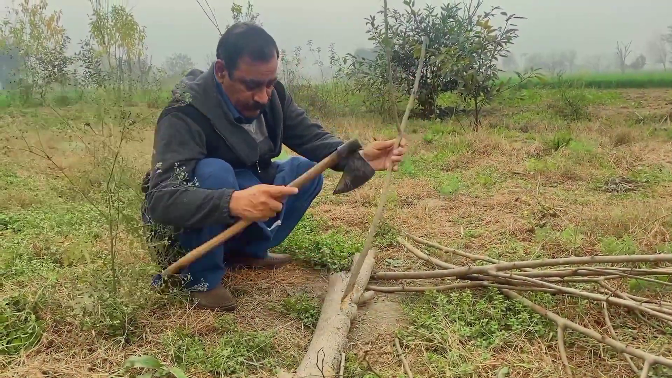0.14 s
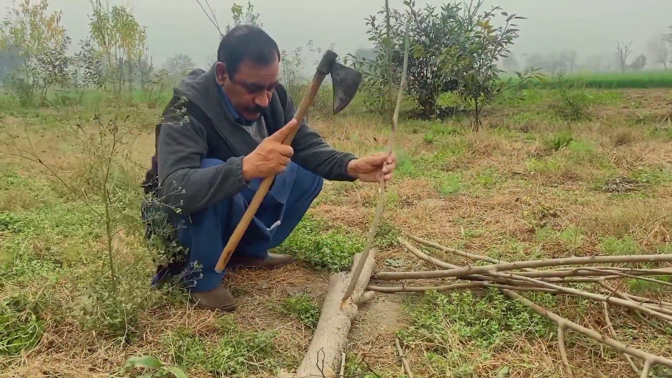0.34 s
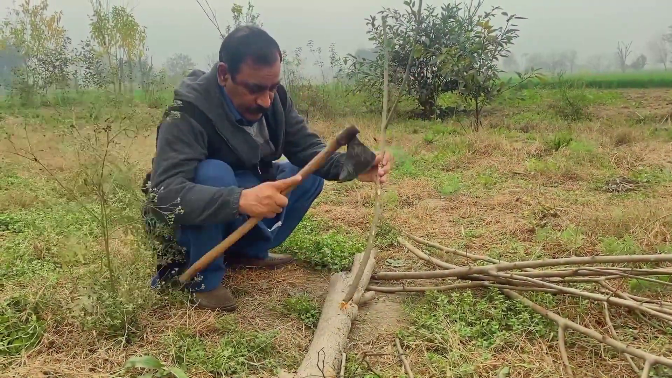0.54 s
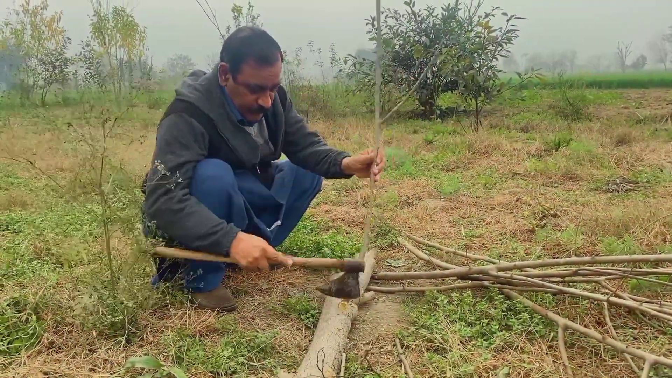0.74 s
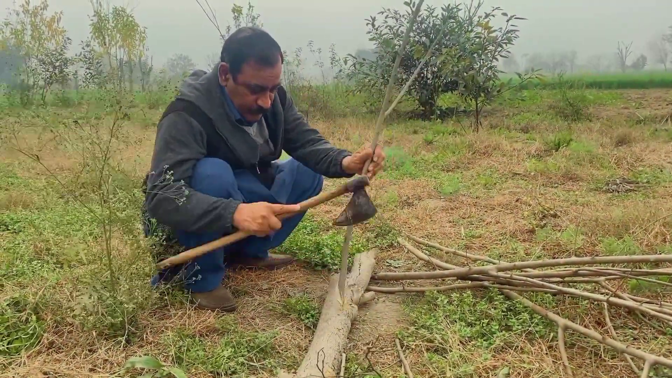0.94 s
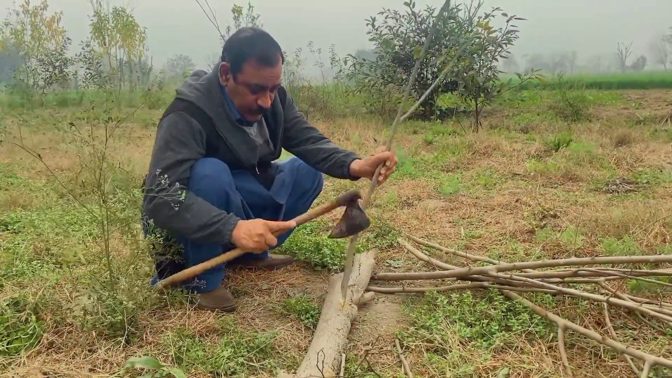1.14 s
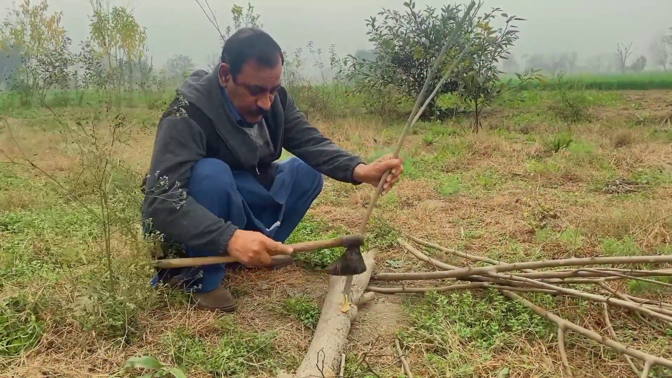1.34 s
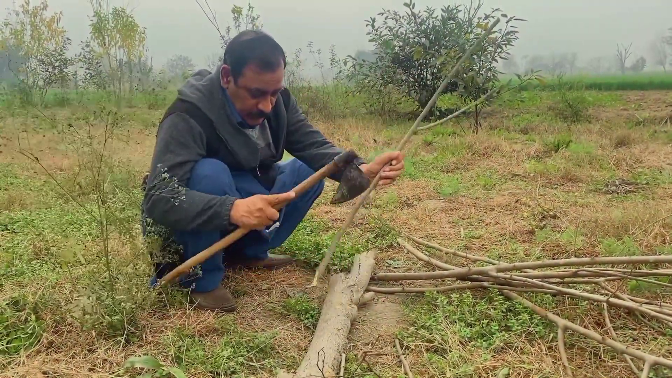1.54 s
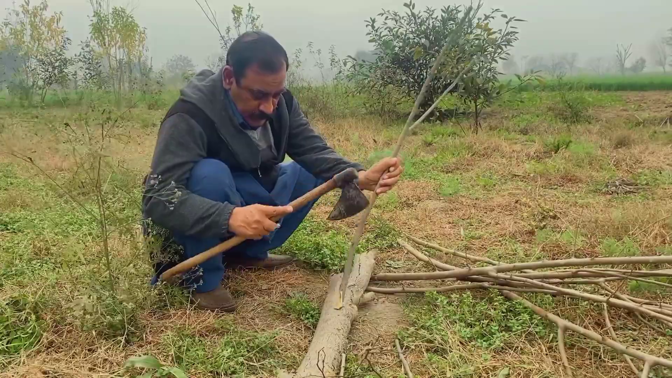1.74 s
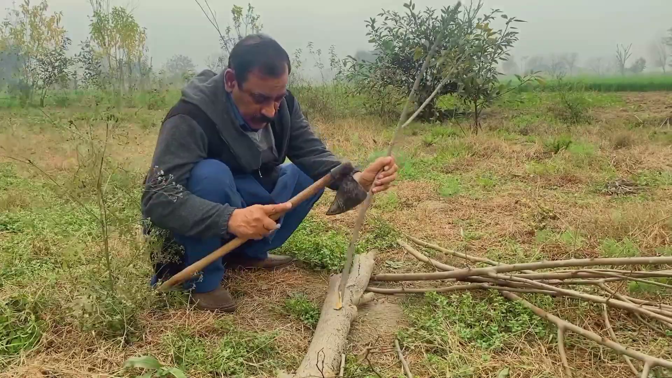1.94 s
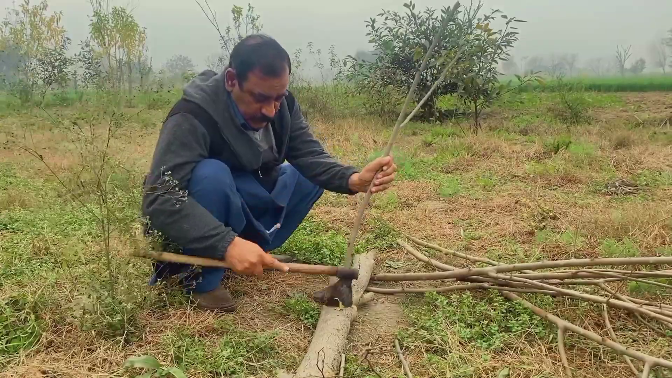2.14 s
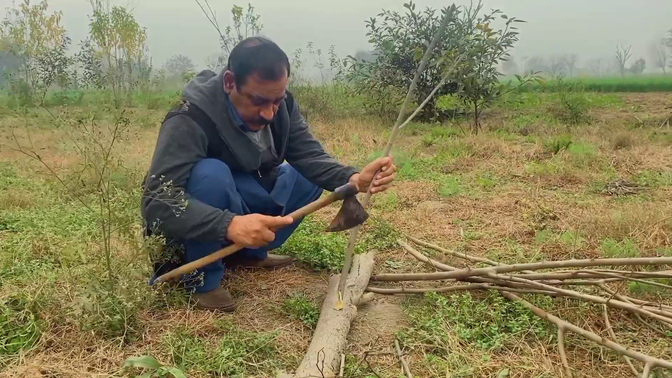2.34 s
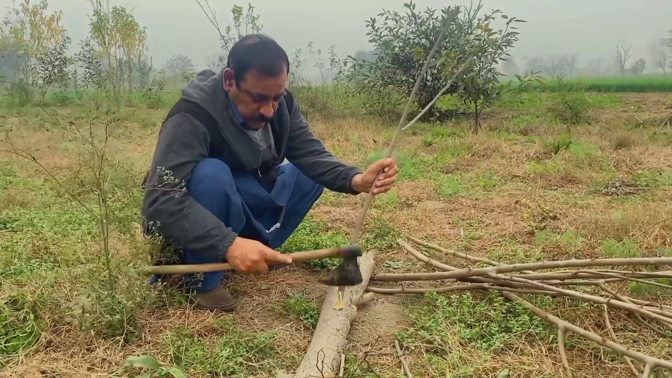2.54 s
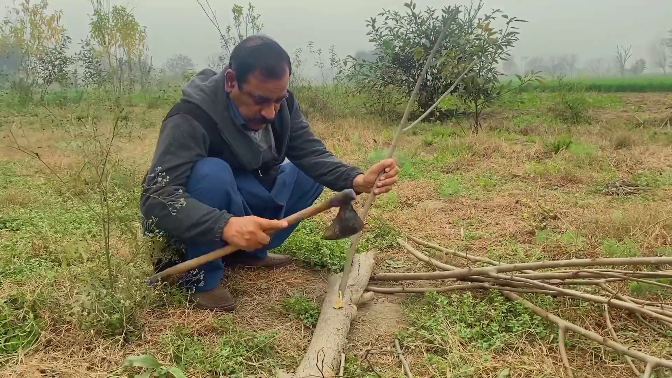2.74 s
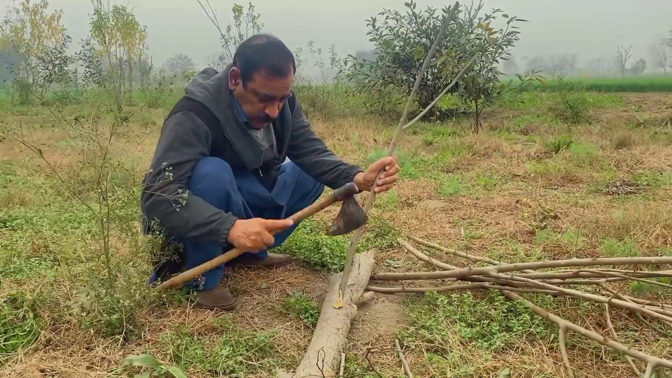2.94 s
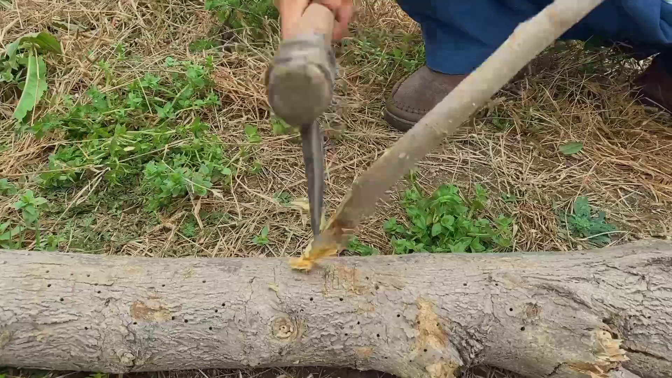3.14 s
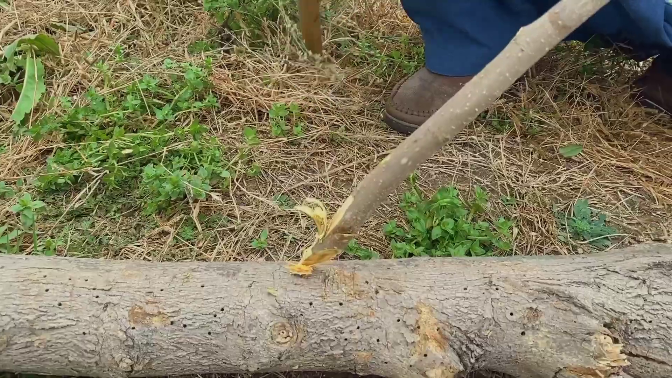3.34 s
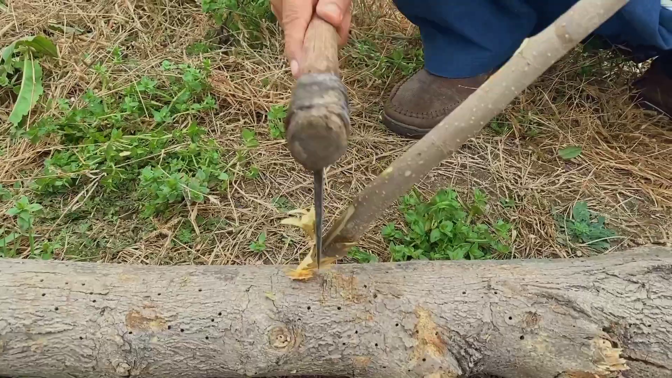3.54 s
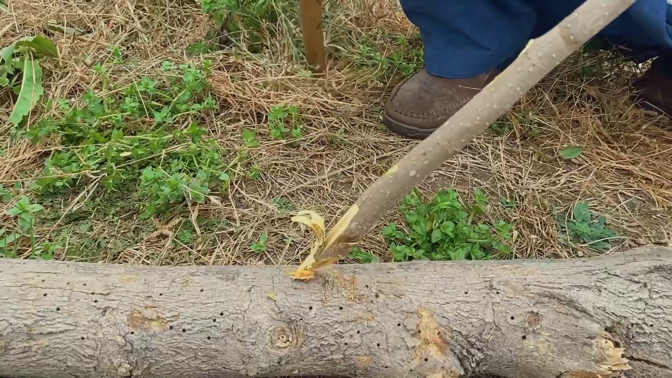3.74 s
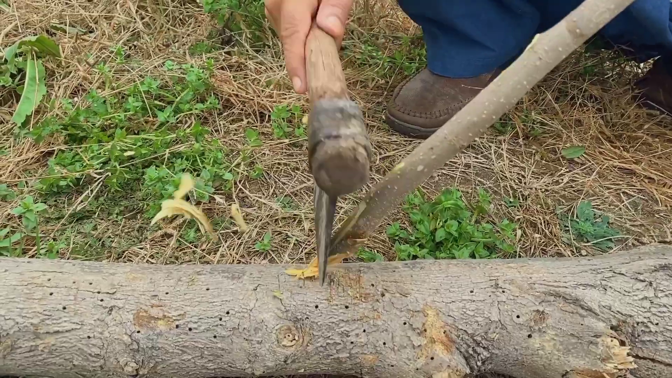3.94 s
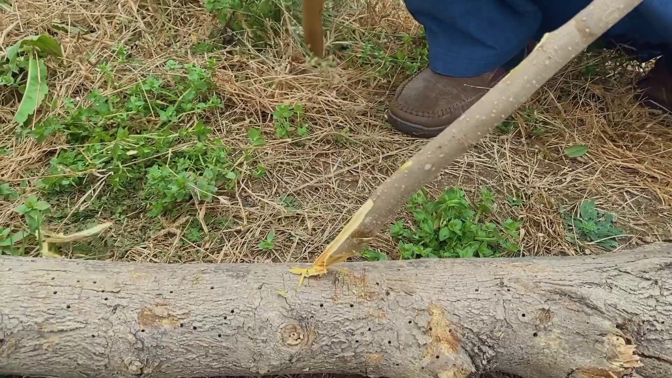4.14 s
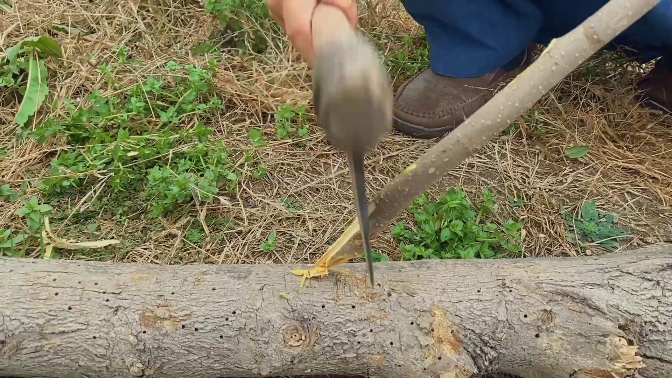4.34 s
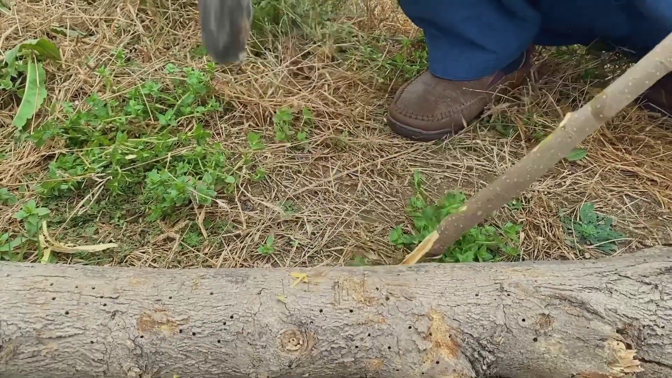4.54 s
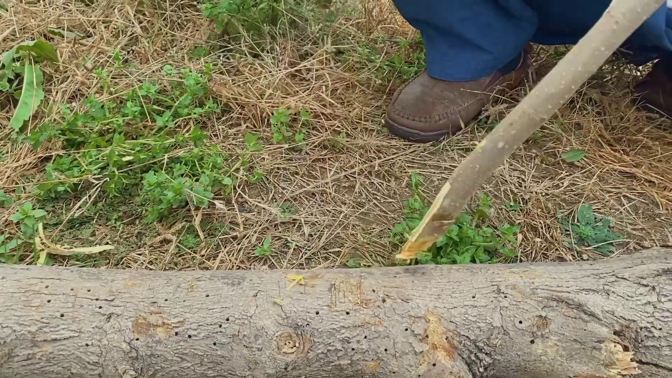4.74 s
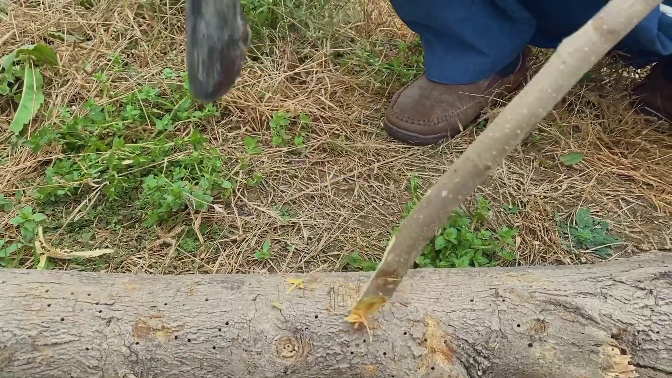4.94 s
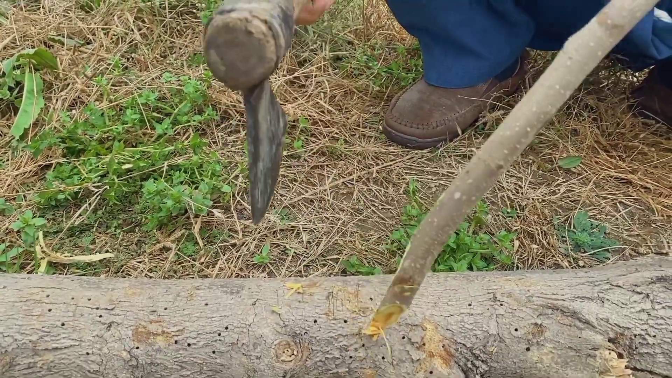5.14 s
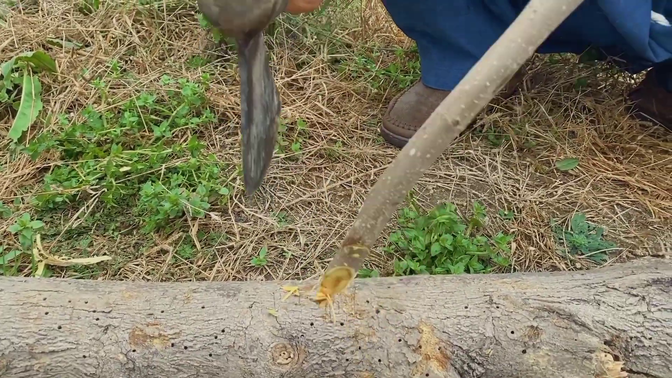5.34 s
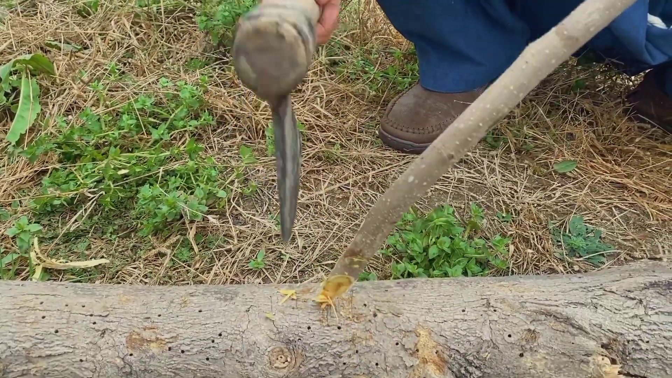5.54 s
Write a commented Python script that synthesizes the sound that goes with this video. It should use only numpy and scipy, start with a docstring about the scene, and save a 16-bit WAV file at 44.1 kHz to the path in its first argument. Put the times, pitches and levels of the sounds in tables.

```python
"""In an open field, a hatchet chops a dry branch held against a log, first a few steps away, then close by.
A stroke bites, drags through the fibres and cracks the last of them: snaps of noise that ring damped modes.
The log then knocks, its modes driven by a contact pulse, and thumps the soil with a tone of sagging pitch.
Crows caw as trilled harmonic series and small birds chirp as gliding tones, far off. A sleeve rustles once,
straw ticks, and filtered noise makes a faint hiss, a low rumble and puffs of air."""
import sys
import numpy as np
from scipy import signal
from scipy.fft import rfft, irfft, next_fast_len
from scipy.io import wavfile
from scipy.ndimage import uniform_filter1d

SR = 44100
rng = np.random.default_rng(int(sys.argv[2]) if len(sys.argv) > 2 else 0)


def store_pcm(level_fs):
    """Save levels as 16-bit WAV."""
    pcm = np.round(np.clip(level_fs, -1, 1) * 32767).astype(np.int16)
    wavfile.write(sys.argv[1], SR, np.atleast_2d(pcm).T)


N = 246959  # samples


def undb(db):
    """Level law: decibels to amplitude gain."""
    return 10 ** (np.asarray(db) / 20)


def clock(seconds):
    """Sampling: the sample times of a short sound, in seconds."""
    return np.arange(int(seconds * SR)) / SR


def unit(x):
    """Power normalisation: scale to rms 1."""
    return x / np.sqrt(np.mean(x ** 2, axis=-1, keepdims=True))


def burst(x, seconds):
    """Energy normalisation: scale a hit to the energy of rms 1 held for that long."""
    return x / np.sqrt(np.sum(x ** 2, axis=-1, keepdims=True) / (seconds * SR))


def curve_db(points, hz):
    """Spectral envelope: interpolate levels on a log-frequency axis."""
    point_hz, point_db = np.transpose(points)
    return np.interp(np.log(hz + 1), np.log(point_hz), point_db)


def colour(x, points, tilt_db=0):
    """Minimum-phase filtering: a causal filter with the given spectrum, tilted per octave in the treble."""
    size = next_fast_len(2 * x.shape[-1], True)
    size += size % 2
    hz = np.arange(size // 2 + 1) * SR / size
    db = curve_db(points, hz) + tilt_db * np.log2(1 + hz / 1000)
    # folding the cepstrum onto positive times makes the filter causal
    cepstrum = irfft(np.log(undb(db)))[:size // 2]
    cepstrum[1:] *= 2
    response = np.exp(rfft(cepstrum, size))
    return irfft(rfft(x, size) * response, size)[..., :x.shape[-1]]


def ring(push, modes, ratio):
    """Modal superposition: a push drives damped modes; neighbours swing in opposite directions."""
    t = np.arange(push.shape[-1]) / SR
    response = np.zeros(len(t))
    for k, (hz, db, t60) in enumerate(modes):
        decay = undb(db - 60 * t / t60)
        response += (-1) ** k * decay * np.sin(2 * np.pi * hz * ratio * t)
    return signal.fftconvolve(np.atleast_2d(push), response[None], axes=1)[:, :len(t)]


def add(out, s, x, pan_db=0):
    """Linear superposition: mix a sound in at time s; a positive pan favours the left."""
    start = max(0, int(s * SR))
    part = x[..., :max(0, N - start)]
    out[:, start:start + part.shape[-1]] += undb([[pan_db / 2], [-pan_db / 2]]) * part


def pair(shape, width):
    """Mid-side stereo: left and right noise; width is the size of the side part against the middle."""
    mid, side = rng.standard_normal((2, shape))
    return np.array([mid + width * side, mid - width * side])


def walk(rate, size=N):
    """Low-pass noise: a smooth random drift, with about this many fresh values per second."""
    hold = int(SR / rate)
    steps = np.repeat(rng.standard_normal(size // hold + 1), hold)
    return uniform_filter1d(steps, hold)[:size]


def arrive(x, direction):
    """Directional hearing: each frequency meets two microphones with its direction's level and phase gap."""
    size = next_fast_len(N + SR // 10, True)
    hz, db, lead = np.transpose(direction)
    axis = np.log(np.arange(size // 2 + 1) * SR / size + 1)
    gain = undb(np.interp(axis, np.log(hz), db) / 2)
    half = gain * np.exp(.5j * np.interp(axis, np.log(hz), lead))
    return irfft(rfft(x, size) * np.array([half, 1 / half]), size)[:, :N]


RUMBLE_GAIN_DB, HISS_DB = 7, -58
# Spectrum of the low rumble. Each row: frequency in Hz, density in dB per Hz.
RUMBLE_SPECTRUM = [(20, 6), (40, 8.5), (80, 7.5), (130, 1), (220, -6), (400, -20), (900, -34), (3000, -80)]
# Course of the rumble. Each row: time in seconds, level in dB before RUMBLE_GAIN_DB.
RUMBLE_LEVEL = [(0.0, -65), (2.289, -65.5), (3.461, -58), (4.6, -64), (4.98, -54.5), (5.6, -57)]
# Spectrum of the hiss of air. Each row: frequency in Hz, density in dB per Hz.
HISS_SPECTRUM = [(100, -15.5), (400, 1), (900, -5.5), (1900, -2.5), (4000, -3.5), (6000, -13),
                 (9000, -22.5), (12000, -8.5), (16000, -14)]
# Puffs of air on the microphone. Each row: start in seconds, length in seconds, level in dB.
PUFFS = [(0.172, 0.13, -35.5), (0.421, 0.19, -41), (3.23, 0.1046, -30), (4.641, 0.078, -39)]


def air(hiss_width=2.86, rumble_width=0.79, gust_db=2, drift_db=1):
    """Filtered noise: a wide smooth hiss, a wavering rumble and a few soft puffs on the microphone."""
    rumble_db = np.interp(np.arange(N) / SR, *np.transpose(RUMBLE_LEVEL)) + RUMBLE_GAIN_DB
    rumble = unit(colour(pair(N, rumble_width), RUMBLE_SPECTRUM))
    out = rumble * undb(rumble_db + gust_db * walk(25))
    hiss = unit(colour(pair(N, hiss_width), HISS_SPECTRUM))
    out += hiss * undb(HISS_DB + drift_db * walk(16.0))
    puff_spectrum = [(8, -35.0), (19, -6.0), (30, -21.5), (55, -40.0), (150, -83), (600, -92.0)]  # (Hz, dB)
    for s, length, db in PUFFS:
        window = np.hanning(int(length * SR))
        puff = colour(pair(SR, 3.3), puff_spectrum)[:, -len(window):]  # the settled end of the filter
        add(out, s, undb(db) * unit(puff * window), 3)
    return out


SLIDE_EASE, QUAVER = 1.3, .007  # exponent of the glide; pitch wander as a share


def whistle(length, from_hz, to_hz, flutter_db=3.5, fade_share=0.27):
    """Frequency modulation: a tone swells, holds and fades as it glides, fast at first, quavering slightly."""
    u = np.linspace(0, 1, int(length * SR))
    glide = to_hz * (from_hz / to_hz) ** ((1 - u) ** SLIDE_EASE)
    pitch = glide * (1 + QUAVER * walk(270)[:len(u)])
    swell = np.minimum(np.minimum(u, 1 - u), fade_share) * undb(flutter_db * walk(68)[:len(u)])
    return unit(swell * np.sin(2 * np.pi * np.cumsum(pitch) / SR))


# Nearest small birds. Each row: start in seconds, length in seconds, first pitch in Hz, last pitch in Hz,
# level in dB.
CHIRPS = [(0.0, 0.23, 1900, 1901, -58), (0.243, 0.075, 1440, 1800, -62.5),
          (0.378, 0.037, 1860, 2100, -58.5), (0.909, 0.11, 3400, 3487, -58.5),
          (1.008, 0.35, 3580, 3353, -64), (1.573, 0.12, 3100, 2895, -69.5),
          (1.862, 0.051, 4630, 3320, -56.5), (1.935, 0.027, 6220, 6100, -47),
          (1.956, 0.021, 5930, 6200, -57), (2.262, 0.061, 3800, 4164, -42.5),
          (2.377, 0.12, 7170, 7100, -48.5), (2.428, 0.058, 6800, 4610, -58),
          (2.501, 0.033, 4900, 5480, -53.5), (2.654, 0.032, 6100, 5500, -57.5),
          (2.681, 0.039, 4900, 5460, -55), (2.72, 0.024, 5130, 4200, -61), (2.795, 0.033, 6350, 5510, -58),
          (2.871, 0.042, 4100, 4360, -49), (2.941, 0.022, 4450, 4330, -60.5),
          (3.025, .06, 5100, 4200, -49.5), (3.018, 0.13, 3465, 3420, -47),
          (3.094, 0.045, 3660, 3730, -51.5), (3.205, 0.046, 5470, 5556, -48),
          (3.233, 0.063, 5720, 5780, -57), (3.254, 0.041, 5000, 3930, -46.5),
          (3.398, 0.047, 4233, 4236, -45.5), (3.497, 0.093, 6310, 5850, -57.5),
          (3.548, 0.056, 5070, 4000, -49), (3.608, 0.029, 3794, 3707, -47.5),
          (4.21, 0.092, 2270, 2360, -45.5), (4.67, 0.028, 2680, 2600, -51),
          (4.727, 0.04, 2616, 2644, -53.5)]
# A tiny bird's runs of thin upward flicks. Each row: start in seconds, count, level in dB.
FLICK_RUNS = [(1.326, 3, -53.5), (2.514, 4, -61), (4.793, 1, -62)]
FLICK_EVERY_S, FLICK_S, FLICK_HZ = 0.0944, 0.015, (6850, 10700)  # first and last pitch
# Farther birds call at random; lengths vary from half to one and a half times CHORUS_S.
CHORUS_PER_S, CHORUS_LOW_HZ, CHORUS_HIGH_HZ = 2.8, 1800, 4250
CHORUS_S, CHORUS_GLIDE_OCT, CHORUS_DB = 0.046, 0.1085, -67  # the glide goes up or down by at most this
# Direction of the trees. Each row: frequency in Hz, left minus right in dB, lead of the left in radians.
FROM_TREES = [(1900, -2, 2.4), (2600, -4.5, 2.3), (3800, 3, 2.24), (5400, -2, 2.73), (7000, 5, 2.8)]


def songbirds():
    """Gliding pure tones: a few clear chirps, runs of high flicks and a faint chorus behind them."""
    out = np.zeros((2, N))
    flicks = []
    for s, count, db in FLICK_RUNS:
        for k in range(round(count)):
            flicks.append((s + k * FLICK_EVERY_S, FLICK_S, *FLICK_HZ, db))
    chorus = []
    for when, long, high, up in rng.random((int(CHORUS_PER_S * N / SR), 4)):
        from_hz = CHORUS_LOW_HZ * (CHORUS_HIGH_HZ / CHORUS_LOW_HZ) ** high
        to_hz = from_hz * 2 ** (CHORUS_GLIDE_OCT * (2 * up - 1))
        chorus.append((when * N / SR, CHORUS_S * (.5 + long), from_hz, to_hz, CHORUS_DB))
    for s, length, from_hz, to_hz, db in CHIRPS + flicks + chorus:
        add(out, s, undb(db) * whistle(length, from_hz, to_hz))
    return arrive(out, FROM_TREES)


LIFT_S, LIFT_LENGTH_S, LIFT_DB = 0.0, 0.36, -62.5  # as the hatchet is first raised
# Spectrum of one snapping fibre, of wood, straw or cloth. Each row: frequency in Hz, level in dB.
CRACKLE = [(150, -12.5), (500, -6), (1400, -2.5), (2800, 5), (4200, 1.5), (6800, -2.5), (8600, -10.5),
           (10300, -8), (12500, -16.5), (16000, -25.5)]


def sleeve(tilt_db=0):
    """Friction noise: cloth brushes past, swelling and fading."""
    out = np.zeros((2, N))
    window = np.hanning(int(LIFT_LENGTH_S * SR))
    rustle = window * colour(pair(len(window), 1.95), CRACKLE, tilt_db)
    add(out, LIFT_S, undb(LIFT_DB) * unit(rustle))
    return out


def fibres(length, width, grain_db=4, first_touch=0.99, release_s=0.0031, after_db=-22, after_s=0.015):
    """Brittle fracture: dense snaps of uneven size grow slightly under load, then a few stragglers die away."""
    t = clock(.2)
    late = np.maximum(t - length, 0)
    wedge = np.interp(t, [0, length], [first_touch, 1])
    force = wedge * (np.exp(-late / release_s) + undb(after_db) * np.exp(-late / after_s))
    grains = np.repeat(rng.standard_normal(len(t)), 12)[:len(t)]  # each size holds for 12 samples
    return force * undb(grain_db * grains) * pair(len(t), width)


# Modes of the branch, damped by the hand and the wedged blade. Each row: frequency in Hz before the pitch
# ratio, level in dB, t60 in seconds.
BRANCH = [(570, -21.5, 0.01234), (884, -6, 0.02), (1390, -11.5, .02), (1590, -10, 0.014),
          (1852, 2.5, 0.016), (1940, -2, 0.026), (2567, 9, 0.012), (2732, 6, 0.011), (3146, -1.5, .01),
          (3404, -1, 0.014), (3960, -1.5, 0.011), (4200, -2.5, 0.0097)]


def tear(length, ring_db, crackle_db, ratio, tilt_db, width=0.47, first_snap_db=20):
    """Impulsive excitation: one sharp snap, then more fibres crackle; all set the branch ringing."""
    cracks = fibres(length, width, release_s=0.0019)
    cracks[:, 0] += undb(first_snap_db)
    snaps = colour(cracks, CRACKLE, tilt_db)
    body = ring(snaps.mean(axis=0), BRANCH, ratio)
    return undb(ring_db) * burst(body, length) + undb(crackle_db) * burst(snaps, length)


CRACK_S = 0.002  # the last fibres, crushed against the log
# Modes of the steel head. Each row: frequency in Hz, level in dB, t60 in seconds.
STEEL = [(4045, -3, .02), (5070, -10, 0.016), (6275, -14, 0.034), (6640, -2.5, 0.0041), (6700, 1.5, 0.0028),
         (10800, -1.5, 0.011)]


def clink(db):
    """Modal ringing: the last fibres' crackle sets the steel head ringing."""
    return undb(db) * burst(ring(fibres(CRACK_S, 0, release_s=0.00029), STEEL, 1), CRACK_S)


# Contact time of a hard knock, the level of that knock, and the drop in level that doubles the time.
CONTACT_S, HARD_KNOCK_DB, CONTACT_DOUBLES_DB = 0.00043, -13, 21.5
# Modes of the log. Each row: frequency in Hz before the pitch ratio, level in dB, t60 in seconds.
LOG = [(185, -22.5, 0.12), (320, -14.5, 0.063), (428.3, -2, 0.028), (530, 5, 0.018), (597.6, 3.5, 0.035),
       (620, -22, 0.028), (967, -7.5, 0.055), (1290, -13.5, 0.041), (1567, -8.5, 0.022)]
# Spectrum of bark crushed under the blade. Each row: frequency in Hz, level in dB.
BARK = [(80, -17.5), (250, -2), (700, -3), (1300, -7.5), (3000, -18.5), (10000, -64.5)]


def knock(db, ratio, bark_db, bark_s):
    """Contact mechanics: the blade rings the log and crushes bark; softer contact lasts longer, so is duller."""
    t = clock(.2)
    contact_s = CONTACT_S * 2 ** ((HARD_KNOCK_DB - db) / CONTACT_DOUBLES_DB)
    push = t * np.exp(-4 * t / contact_s)
    bark = colour(np.exp(-t / bark_s) * pair(len(t), 0.45), BARK)
    return undb(db) * burst(ring(push, LOG, ratio), 0.0018) + undb(bark_db) * burst(bark, 0.0043)


def thud(db, hz, sag, swell_s=0.0053, sag_s=0.0052, soil_db=-22, soil_s=0.0063):
    """Yielding support: the log rocks for a few cycles, its pitch sagging as the ground yields."""
    t = clock(.2)
    phase = 2 * np.pi * np.cumsum(hz * (1 + sag * np.exp(-t / sag_s))) / SR
    rock = burst(t * np.exp(-t / swell_s) * np.sin(phase), 0.0057)
    soil_noise = t * np.exp(-t / soil_s) * pair(len(t), 1.0)
    soil = burst(colour(soil_noise, RUMBLE_SPECTRUM), 0.18)
    return undb(db) * (rock + undb(soil_db) * soil)


CLOSE_FROM_S = 3.03  # later strokes fall close by
BITE_CRACKLE_DB, CRACK_RING_DB = -2, -14.5  # crackle against the bite's ring; ring against the last crack
# The blade bites through a bundle of fibres. Each row: start in seconds, length in seconds, level in dB,
# crackle tilt in dB per octave, branch pitch ratio.
BITES = [(0.678, 0.016, -33, -1.5, 1.12), (1.2288, 0.0026, -33, -6.5, .95), (1.233, 0.018, -43, 2, 0.77),
         (1.248, 0.0081, -41.5, -3, 0.83), (2.1564, 0.0093, -27, 1, .88), (2.5808, 0.003, -24, 0.5, 0.9),
         (2.584, 0.0055, -25.5, 1.5, 1.38), (3.0614, 0.0024, -15, 2, 1.02),
         (3.0643, 0.00092, -16.5, -3, 0.95), (3.4726, 0.0012, -15.5, -2.5, 1.02),
         (3.4758, .0025, -17, -5.5, 1.005), (3.8786, 0.0048, -19, -1.5, 0.99),
         (3.8885, 0.0041, -22.5, 5.5, 0.81), (4.3534, 0.0015, -13.5, 0.5, 0.99),
         (4.3559, 0.0011, -10.5, -1.5, 1), (4.361, 0.013, -31.5, -2, 0.93)]
# The last fibres crack and the steel clinks as the blade gets through. Each row: start in seconds,
# crack level in dB, crackle tilt in dB per octave, steel level in dB.
LANDINGS = [(0.688, -28.5, 6.5, -37), (1.254, -33, 6, -55), (2.169, -21.5, -5.5, -28),
            (2.5881, -29, 3, -39), (3.0658, -26, -5.5, -19), (3.48, -24, 7.5, -33), (3.8971, -16, 6, -17),
            (4.3775, -20, 0.5, -21.5)]
# Blows on the log. Each row: start in seconds, knock level in dB, log pitch ratio, bark level in dB,
# decay of the bark crush in seconds.
KNOCKS = [(0.689, -10.5, 1, -27.5, 0.013), (1.2558, -40.5, 1, -38.5, 0.0093),
          (1.566, -35.5, .55, -43.5, .004), (2.171, -33, 1.03, -30.5, .007),
          (2.589, -39.5, .95, -42, 0.018), (3.066, -39.5, 1.5, -27, 0.0093),
          (3.479, -36, 1.525, -25.5, 0.0098), (3.8982, -20, 1.2, -15.5, 0.0081),
          (4.3789, -17.5, 1.05, -20, .005), (4.383, -13, 1.06, -21, .004)]
# The log rocks on the soil. Each row: start in seconds, level in dB, settled pitch in Hz, share by which
# the pitch starts higher.
THUDS = [(.692, -27, 190, 0.36), (1.151, -47.5, 126, .3), (1.256, -45, 165, .3), (1.567, -34.5, 85.1, 3.2),
         (2.173, -30.5, 143.2, .8), (2.594, -52, 128, 0.26), (3.0709, -19, 136.8, 0.39),
         (3.486, -21.5, 117, 0.68), (3.901, -21.5, 119, 0.89), (4.383, -29, 107, .5)]
# Direction of the log a few steps away. Each row: frequency in Hz, left minus right in dB, lead of the
# left in radians.
FROM_FAR_LOG = [(100, 2, 0.4), (250, -1.5, -1.7), (500, -2.5, 0.12), (1000, 1.5, 1.34), (1800, -5, -0.6),
                (2700, -0.5, 1.02), (4200, -1.5, 1.5), (7200, 1.5, 0.94), (11500, -2, 4)]
# Direction of the log close by. Each row: frequency in Hz, left minus right in dB, lead of the left in
# radians.
FROM_CLOSE_LOG = [(110, -4.5, -1.1), (260, -4.5, -1), (481.5, -1, -2.5), (930, -.5, -6), (1800, 2.5, -5),
                  (2667, 7, -5.5), (4200, 2.5, -5.5), (7000, 2, -6), (11900, -.5, -2)]


def hatchet():
    """Successive impacts: bites through wood, a last crack with a clink of steel, the log's knock and thud."""
    far, close = np.zeros((2, 2, N))

    def place(s):
        """Source position: choose the far or the close log by the time."""
        return close if s > CLOSE_FROM_S else far

    for s, length, db, tilt_db, ratio in BITES:
        add(place(s), s, tear(length, db, db + BITE_CRACKLE_DB, ratio, tilt_db))
    for s, db, tilt_db, steel_db in LANDINGS:
        last_crack = tear(CRACK_S, db + CRACK_RING_DB, db, 0.86, tilt_db)
        add(place(s), s, last_crack + clink(steel_db))
    for s, db, ratio, bark_db, bark_s in KNOCKS:
        add(place(s), s, knock(db, ratio, bark_db, bark_s))
    for s, db, hz, sag in THUDS:
        add(place(s), s, thud(db, hz, sag))
    return arrive(far, FROM_FAR_LOG) + arrive(close, FROM_CLOSE_LOG)


STRAW_PER_S, STRAW_S, STRAW_DB = 1.2, 0.0051, -61  # stray ticks of dry straw
# Splinters cracking. Each row: start in seconds, length in seconds, level in dB.
SPLINTERS = [(3.017, 0.0031, -51.5), (4.243, 0.026, -50.5), (4.273, 0.0011, -40), (4.426, 0.0038, -44.5),
             (4.934, 0.0035, -45.5)]


def splinters(tilt_db=-1):
    """Random fracture: stray ticks in the straw, and small cracks as the branch is twisted."""
    out = np.zeros((2, N))
    straw_times = rng.uniform(0, N / SR, int(STRAW_PER_S * N / SR))
    straw = [(s, STRAW_S, STRAW_DB) for s in straw_times]
    for s, length, db in straw + SPLINTERS:
        crack = colour(fibres(length, 0.14), CRACKLE, tilt_db)
        add(out, s, undb(db) * burst(crack, length), 1)
    return out


TRILL_DEPTH, TRILL_REF_HZ = 0.13, 72.4  # pitch swing as a share, at this trill rate; faster ones swing wider
CAW_ARCH, TRILL_UNSTEADY = .19, .09  # pitch drop at the ends and trill rate wander, as shares
THROAT_SIZE = 0.99  # dividing the throat's frequencies by this gives those heard
# Crows. Each row: start in seconds, length in seconds, top pitch of the arch in Hz, level in dB,
# boost of the fundamental in dB, mean trill rate in Hz.
CAWS = [(1.021, .28, 834.4, -53.5, -5.5, 73.1), (1.705, .285, 808.6, -55, 1, 71.1),
        (2.608, .245, 814, -55.5, -1.5, 71.4), (3.453, .26, 886.5, -55, -11, 75.2),
        (3.918, .37, 939, -62.5, -23.5, 176.7), (4.475, .38, 924, -62, -14, 179.7)]
# Resonance of a crow's throat. Each row: frequency in Hz before THROAT_SIZE, level in dB.
THROAT = [(400, -12.5), (750, -4), (900, -3.5), (1200, -4.5), (1650, 2.5), (2100, 3.5), (2400, -18),
          (3200, -22.5), (4300, -12), (5000, -30)]
# Direction of the crows. Each row: frequency in Hz, left minus right in dB, lead of the left in radians.
FROM_CROWS = [(800, 0, 0.96), (1604, -7, 2.34), (2100, -6.5, 1.17)]


def crows(jitter=0.023, throb_db=1.5):
    """Source and filter: a caw swells and arches in pitch; a fast trill in pitch and loudness makes it harsh."""
    out = np.zeros((2, N))
    for s, length, top_hz, db, fundamental_db, trill_hz in CAWS:
        u = np.linspace(-1, 1, int(length * SR))
        arch = 1 - CAW_ARCH * u ** 2
        rasp = (TRILL_REF_HZ / trill_hz) ** 2  # slow trills are the uneven ones
        trill_rate = trill_hz * (1 + TRILL_UNSTEADY * rasp * walk(33, len(u)))
        trill = np.sin(2 * np.pi * np.cumsum(trill_rate) / SR)
        depth = TRILL_DEPTH * np.sqrt(trill_hz / TRILL_REF_HZ)
        hz = top_hz * arch * (1 + depth * trill + jitter * rasp * walk(330, len(u)))
        phase = 2 * np.pi * np.cumsum(hz) / SR
        voice = np.zeros(len(u))
        for k in range(1, 7):  # harmonics
            harmonic_db = curve_db(THROAT, k * hz * THROAT_SIZE) + fundamental_db * (k == 1)
            voice += undb(harmonic_db) * np.sin(k * phase)
        swell = (1 - u ** 2) ** .6
        add(out, s, undb(db) * unit(voice * undb(throb_db * trill) * swell))
    return arrive(out, FROM_CROWS)


def field(x, wet_db, t60_s, tilt_db):
    """Diffuse scattering: ground, bushes and far trees send back a thin, decaying tail."""
    t = clock(.8)
    onset = np.minimum(t / .015, 1)
    tail = pair(len(t), 1) * undb(-60 * t / t60_s) * onset
    tail_spectrum = [(100, 8.5), (1500, -0.5), (6000, 2.5), (15000, -33.5)]  # (Hz, dB)
    tail = burst(colour(tail, tail_spectrum, tilt_db), 1 / SR)
    return x + undb(wet_db) * signal.fftconvolve(x, tail, axes=1)[:, :N]


def scene():
    """Superposition of sources: chopping in the foreground, birds far away, open air."""
    chopping = field(hatchet() + splinters() + sleeve(), wet_db=-33, t60_s=0.2, tilt_db=4)
    birds = field(crows() + songbirds(), wet_db=-11, t60_s=0.32, tilt_db=-0.5)
    return chopping + birds + air()


TOP_HZ = 15900


def record(dry):
    """Band limiting: the recorder cuts the top with a steep elliptic low-pass."""
    return signal.sosfilt(signal.ellip(8, .2, 70, TOP_HZ, fs=SR, output="sos"), dry)


dry = scene()
out = record(dry)
store_pcm(out)
```